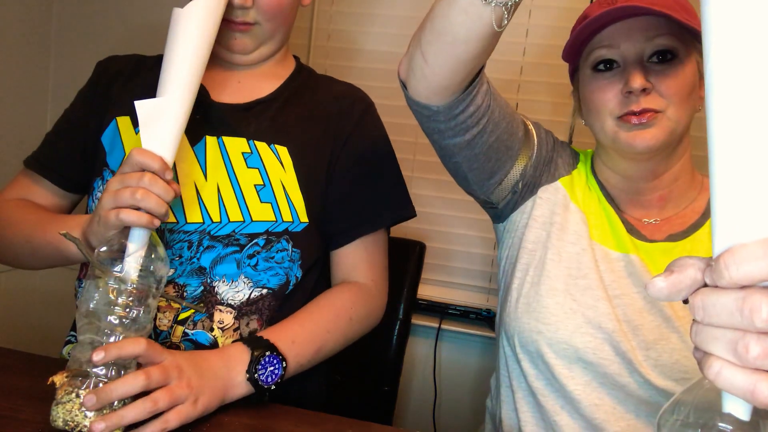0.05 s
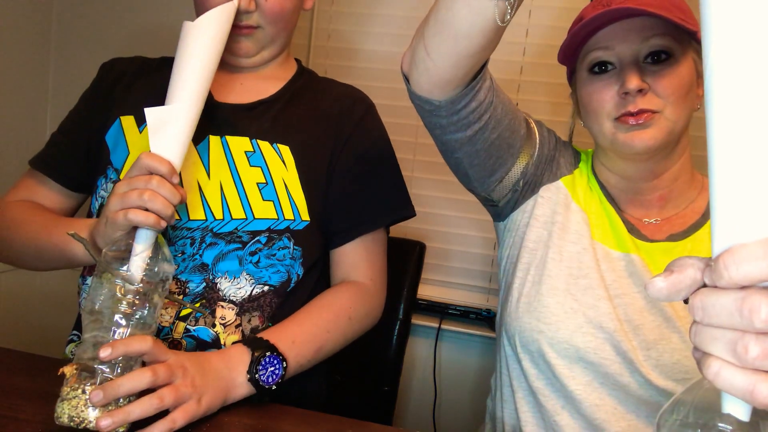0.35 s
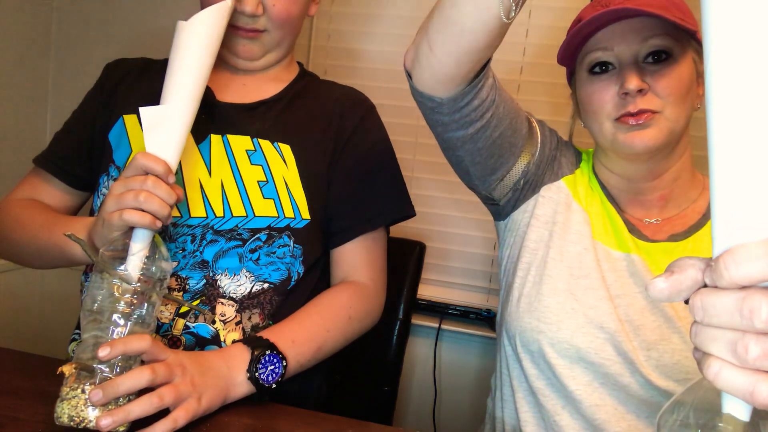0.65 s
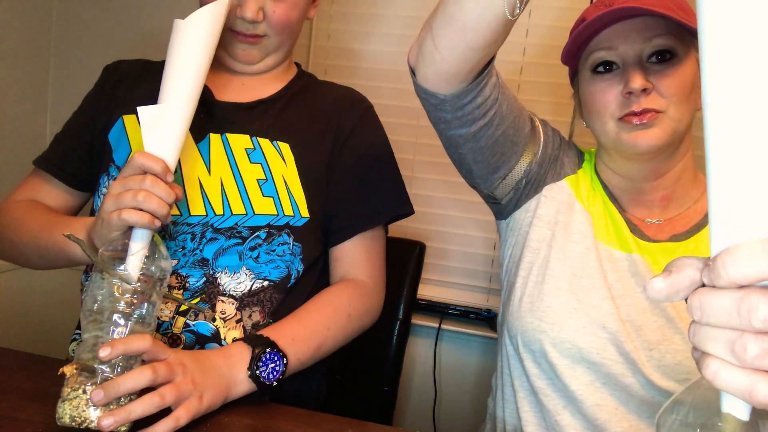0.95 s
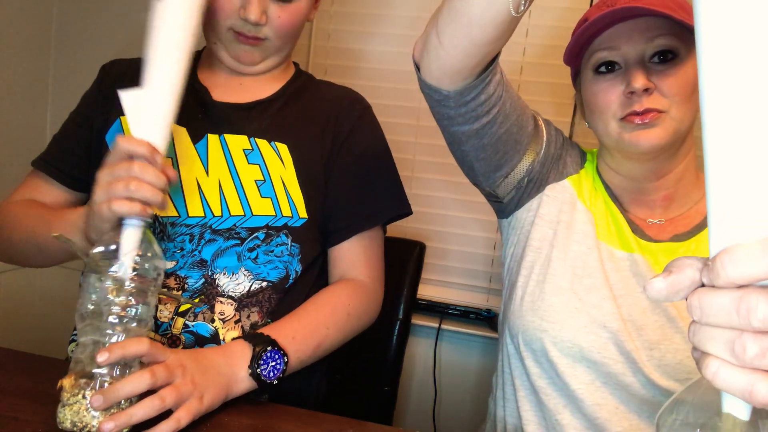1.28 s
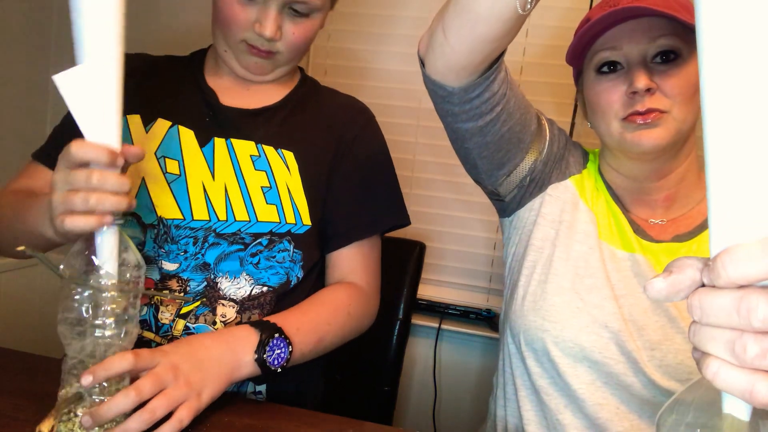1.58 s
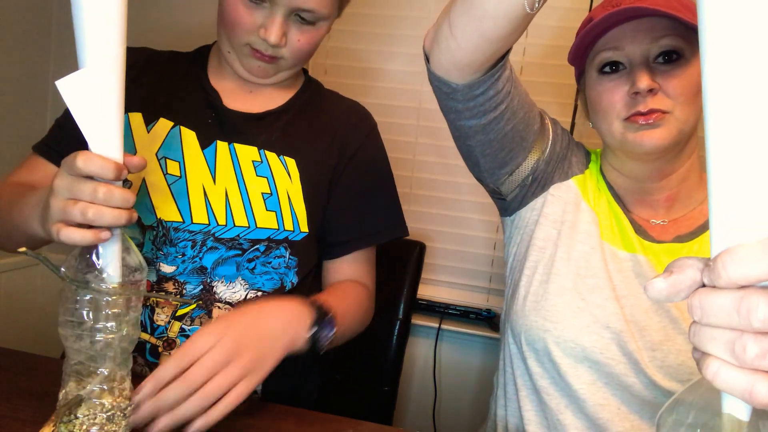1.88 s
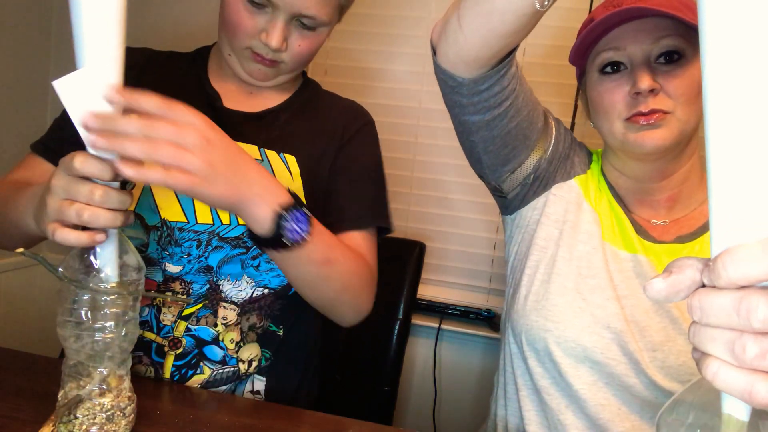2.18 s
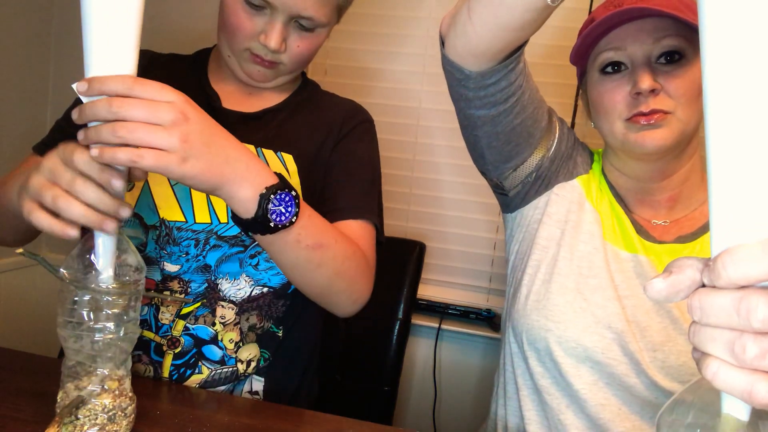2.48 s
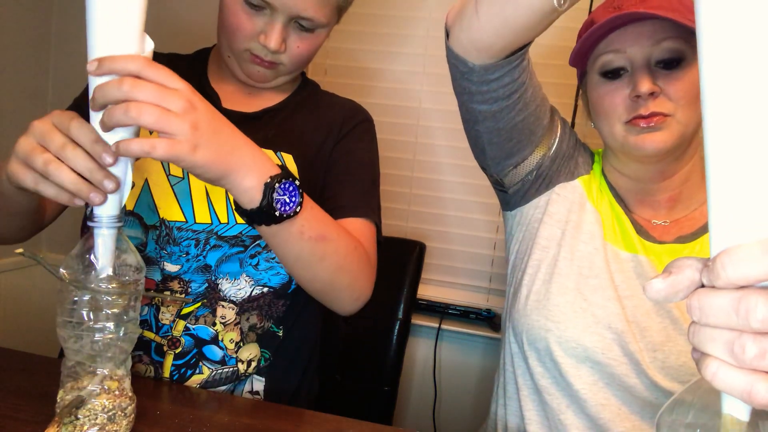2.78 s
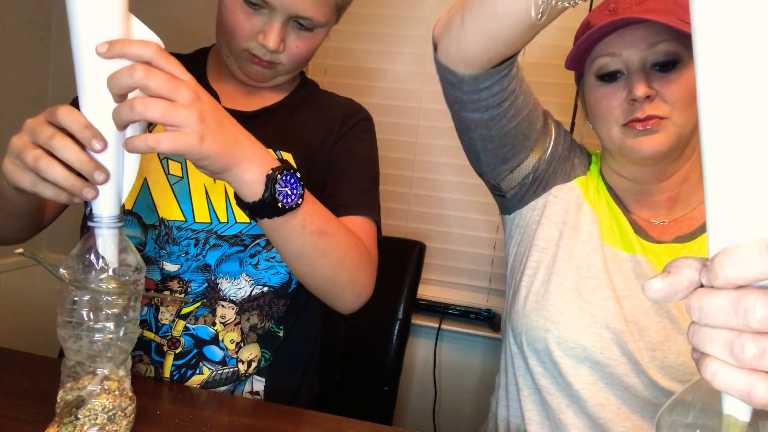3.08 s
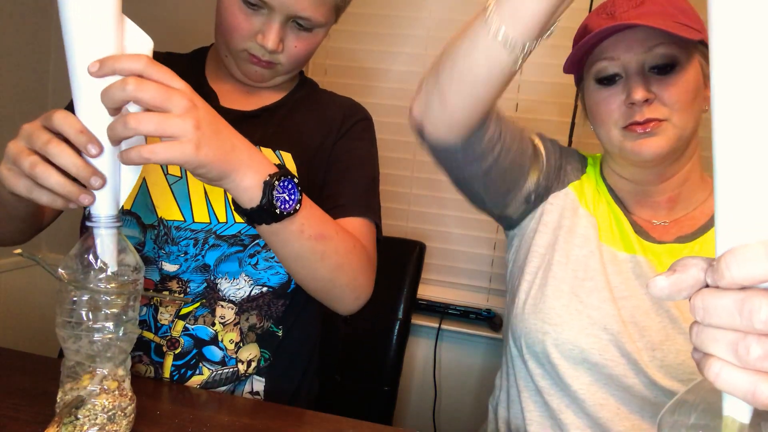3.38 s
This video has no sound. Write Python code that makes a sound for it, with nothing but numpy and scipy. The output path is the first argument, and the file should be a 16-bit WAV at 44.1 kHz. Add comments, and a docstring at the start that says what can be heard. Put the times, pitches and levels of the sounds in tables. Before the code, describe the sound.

Seed rattles down a paper funnel into a plastic bottle, followed by light paper crinkles.

```python
"""Bird seed funnelled into a bottle.

In a small room, loose seeds tick down a rolled paper funnel; a dense stream rattles in a plastic
bottle, then thins to a duller trickle on the paper. Fingers shift the funnel: it bumps the neck,
crinkles and rubs softly. Each contact is a short click filtered by the body it excites."""
import sys
import numpy as np
from scipy import signal
from scipy.fft import rfft, irfft
from scipy.io import wavfile
from scipy.ndimage import uniform_filter1d, map_coordinates

SR = 44100
rng = np.random.default_rng(int(sys.argv[2]) if len(sys.argv) > 2 else 0)


def output_pcm(signal):
    """Save a mono or channel-first signal as 16-bit PCM at the path in sys.argv[1].

    Samples are clipped to [-1, 1] before scaling.
    """
    pcm = np.clip(np.atleast_2d(signal).T, -1, 1) * 32767
    wavfile.write(sys.argv[1], SR, np.round(pcm).astype(np.int16))


N = 160965

# Plastic bottle response. Each row: frequency in Hz, level in dB.
BOTTLE_COLOUR = [(100, -64), (250, -26.5), (400, -14.5), (700, -9), (1700, 1.5), (3100, 1.5), (4500, -3),
                 (7500, -1.5), (8600, -7.5), (10400, -10.5), (11500, -10.5), (16000, -14.5)]
# Bottle resonances. Each row: frequency in Hz, width in Hz, lift in dB.
BOTTLE_MODES = [(351, 12, 7), (764, 25, 4.5), (1161, 45, 6), (2500, 52, 1.5), (5440, 100, 4),
                (10300, 490, -9.5)]


def undb(db):
    """Decibels to gain."""
    return 10 ** (np.asarray(db) / 20)


def on_log(points, hz):
    """Interpolate (Hz, value) points over log frequency."""
    f, v = np.array(points).T
    return np.interp(np.log(hz + 1), np.log(f), v)


def unit(x):
    """Scale to unit energy."""
    return x / np.sqrt(np.sum(x ** 2, axis=-1, keepdims=True))


def add(out, start_s, x):
    """Mix x into out."""
    i = max(int(start_s * SR), 0)
    out[i:i + len(x)] += x[:max(len(out) - i, 0)]


def body(colour, modes=(), size=4096):
    """Minimum-phase response: broad colour plus resonances."""
    hz = np.fft.rfftfreq(size, 1 / SR)
    db = on_log(colour, hz) + sum(lift / (1 + (2 * (hz - f) / w) ** 2) for f, w, lift in modes)
    cepstrum = irfft(np.log(undb(db)))
    cepstrum[1:size // 2] *= 2
    cepstrum[size // 2 + 1:] = 0
    return unit(irfft(np.exp(rfft(cepstrum))))


def room(x, wet_db, build_s=0.0005, size=16384):
    """Add a short diffuse tail, new per call; bass lasts longest."""
    # Each row: frequency in Hz, T60 in seconds.
    decay = [(300, 0.54), (1200, 0.37), (4000, 0.3), (12000, 0.36)]
    t, hz = np.arange(size) / SR, np.fft.rfftfreq(size, 1 / SR)
    noise, tail = rfft(rng.standard_normal(size)), 0
    for f, t60_s in decay:
        band = on_log([(g, float(g == f)) for g, _ in decay], hz)
        tail = tail + irfft(noise * band) * np.exp(-np.log(1000) * t / t60_s)
    tail = unit(tail * (1 - np.exp(-t / build_s)))
    return (x + undb(wet_db) * signal.fftconvolve(x, tail)[:N]) / np.hypot(1, undb(wet_db))


def contacts(hz, ring_s, lift_db, treble_db=0, size=512, width_oct=0.55, rise_share=0.61):
    """One click per pitch: a fast-dying mode cluster, lifted near that pitch."""
    f = np.fft.rfftfreq(size, 1 / SR) + 1
    age = (np.arange(size) + 1) / SR / ring_s
    db = lift_db * np.exp(-.5 * (np.log2(f / np.reshape(hz, (-1, 1))) / width_oct) ** 2)
    db = db + treble_db * f ** 2 / (f ** 2 + 4500 ** 2)
    ring = irfft(np.exp(2j * np.pi * rng.random(db.shape)) * undb(db))
    return unit(ring * np.exp(-age) * (1 - np.exp(-age / rise_share)))


def shower(flow, response, per_s, scatter_db, ring_s, surge_db=1, count=9000, spots=4, surge_per_s=41):
    """Random impacts in spurts on a body; stronger flow brings more and harder ones."""
    when, lot, pitch = rng.random((count, 3)).T
    when_s = when * N / SR
    force = undb(scatter_db * np.clip(rng.standard_normal(count), -2, 2))
    flow_s, flow_db = np.array(flow).T
    gain = undb(np.interp(when_s, flow_s, flow_db, left=-120, right=-120))
    rate = np.minimum(per_s * np.sqrt(gain / gain.max()), count * SR / N)
    surge = undb(surge_db * np.interp(when_s * surge_per_s, np.arange(count), rng.uniform(-2, 2, count)))
    force = force * surge / np.sqrt(np.mean(force ** 2)) * gain * np.sqrt(SR / rate)
    clicks = contacts(500 * 2 ** (5 * pitch), ring_s, lift_db=7, size=256)
    tracks = np.zeros((spots, N))
    for k in np.flatnonzero(lot < rate * N / SR / count):
        add(tracks[k % spots], when_s[k], force[k] * clicks[k])
    return signal.oaconvolve(sum(room(x, wet_db=-6) for x in tracks), response)[:N]


def strikes(rows, response, ring_s):
    """Single timed clicks on a body."""
    out = np.zeros(N)
    for start_s, db, hz, treble_db in rows:
        contact = contacts(hz, ring_s, lift_db=11, treble_db=treble_db)[0]
        click = unit(signal.fftconvolve(contact, response))
        add(out, start_s, undb(db) * np.sqrt(ring_s * SR) / 3 * click)
    return out


def skitter():
    """The first loose seeds bounce down the paper."""
    # Each row: time in seconds, level in dB.
    flow = [(0, -37.5), (0.035, -50.5), (0.1, -45), (0.17, -46), (0.23, -41), (0.27, -50), (0.3, -44.5),
            (0.45, -36.5), (0.55, -48)]
    # Each row: frequency in Hz, level in dB.
    colour = [(100, -46), (450, -4), (1000, 5.5), (1800, 1.5), (3000, 1), (4800, -2.5), (6500, 0),
              (10000, -27), (16000, -23)]
    # Each row: frequency in Hz, width in Hz, lift in dB.
    modes = [(1030, 190, 4.5), (1210, 37, -1), (1800, 290, 5.5), (3850, 510, 8), (5540, 350, 3)]
    return shower(flow, body(colour, modes), per_s=550, scatter_db=2, ring_s=0.0015)


def seed_ticks():
    """Single seeds strike the bottle hard."""
    # Each row: start in seconds, relative level in dB, pitch in Hz, treble in dB.
    hits = [(0.009, -25, 1080, 12), (0.016, -28, 1750, 12), (0.054, -23, 3840, 11), (0.063, -20, 3960, 11),
            (0.086, -19.5, 1780, -5), (0.098, -24, 2230, 15), (0.115, -25.5, 1090, 1.5),
            (0.133, -23.5, 3820, 30), (0.199, -26, 1030, 29), (0.206, -21, 1450, -1),
            (0.217, -20.5, 3930, -15), (0.234, -25, 1800, -1), (0.287, -16, 1900, 5),
            (0.296, -16, 3670, 11), (0.329, -12, 2340, -6), (0.355, -15.5, 1800, 11),
            (0.373, -16.5, 1990, -16), (0.388, -18, 5260, -5), (0.391, -20.5, 1160, 1),
            (0.409, -26, 6000, 7), (0.426, -21, 3000, 2), (0.437, -11.5, 2420, 17), (0.468, -7, 3720, 15),
            (0.512, -10, 1710, 7), (0.522, -10.5, 6030, 1), (0.543, -13, 3340, -26),
            (0.566, -8.5, 2650, -23), (0.587, -16, 1180, -8), (0.619, -5.5, 3270, -9),
            (0.652, -9.5, 1150, -3), (0.69, -10, 1780, -6), (0.787, -11, 3470, 8), (0.834, -13, 2570, 0),
            (0.964, -8, 2580, 2), (0.985, -9.5, 2300, 1), (1.008, -20, 3630, 2), (1.045, -11, 5410, 1),
            (1.082, -11, 7000, 13), (1.259, -10, 3170, 7), (1.335, -13.5, 2590, 0), (1.4, -10, 3060, 4),
            (1.476, -8.5, 3030, 8), (1.584, -7, 3600, 25)]
    return room(strikes(hits, body(BOTTLE_COLOUR, BOTTLE_MODES), ring_s=0.0016), wet_db=-9)


def wall_pings(t60_s=0.24):
    """One bottle wall mode rings on after a seed."""
    # Each row: start in seconds, level in dB, pitch in Hz.
    pings = [(0.149, -40, 1213), (0.385, -43, 1140)]
    out, t = np.zeros(N), np.arange(SR // 2) / SR
    for start_s, db, hz in pings:
        add(out, start_s, undb(db) * np.sin(2 * np.pi * hz * t) * np.exp(-np.log(1000) * t / t60_s))
    return out


def stream():
    """Dense seed rattles in the bottle, with sparse, bright husk ticks."""
    # Each row: time in seconds, level in dB.
    seed_flow = [(0.3, -68), (0.42, -40), (0.5, -31.5), (0.6, -25), (0.72, -26.5), (1.0, -27.5),
                 (1.35, -27), (1.6, -27), (1.77, -29), (1.83, -34.5), (2.2, -36.5), (2.42, -48),
                 (2.66, -41), (2.78, -53)]
    husk_flow = [(0.36, -46), (0.55, -38), (1.0, -41.5), (1.7, -36.5), (2.1, -50), (2.65, -50.5),
                 (2.75, -63)]
    # Each row: frequency in Hz, level in dB.
    husk_colour = [(100, -48), (700, -21), (2000, 1.5), (7000, -4.5), (10400, -2), (12500, -4.5),
                   (16000, -4.5)]
    bottle = body(BOTTLE_COLOUR, BOTTLE_MODES)
    seeds = shower(seed_flow, bottle, per_s=1500, scatter_db=1, ring_s=0.00063, surge_db=0.5)
    husks = shower(husk_flow, body(husk_colour), per_s=76, scatter_db=5.5, ring_s=0.0004,
                   count=1000, spots=1)
    return seeds + husks


def flex(x, share=0.018, per_s=12):
    """The funnel flexes in the hand; a time warp makes its resonances wander."""
    steps = np.arange(N) / SR * per_s
    bend = rng.standard_normal(int(steps[-1]) + 2)
    shift = np.cumsum(np.interp(steps, np.arange(len(bend)), bend)) * share
    shift = shift - uniform_filter1d(shift, SR // 2)
    return map_coordinates(x, [np.arange(N) + shift], order=5, mode="mirror")


def trickle():
    """Seed patters in the flexing paper funnel."""
    # Each row: time in seconds, level in dB.
    flow = [(0.45, -38.5), (1.1, -37.5), (1.55, -35.5), (1.75, -31.5), (1.95, -31.5), (2.16, -31),
            (2.39, -32.5), (2.55, -34.5), (2.69, -36), (2.77, -46.5), (2.93, -47.5)]
    # Each row: frequency in Hz, level in dB.
    colour = [(100, -35), (260, -9.5), (450, -4), (900, 0), (2000, 3), (4200, 3), (4950, -2.5), (5800, 0.5),
              (8500, -7.5), (10400, -10), (11500, -8), (16000, -11)]
    # Each row: frequency in Hz, width in Hz, lift in dB.
    modes = [(393, 9.8, 6.5), (651, 58, 7.8), (742, 76, 7.3), (1080, 110, 4.6), (1614, 91, 6.1),
             (1860, 160, 3), (3620, 290, 3.2)]
    return flex(shower(flow, body(colour, modes), per_s=1100, scatter_db=3, ring_s=0.0015, surge_db=1.24))


def neck_bumps():
    """The funnel knocks on the bottle neck."""
    # Each row: start in seconds, relative level in dB, pitch in Hz.
    bumps = [(1.24, -14.5, 620), (1.989, -12.5, 615), (1.994, -11, 1550), (2.083, -16.5, 483),
             (2.12, -10.5, 1720), (2.134, -11, 1400), (2.146, -13, 1500), (3.094, -19.5, 1020),
             (3.167, -20.5, 500), (3.212, -12, 1490), (3.222, -15.5, 504), (3.243, -8.5, 1280),
             (3.249, -12.5, 790), (3.255, -7, 1140)]
    # Each row: frequency in Hz, level in dB.
    colour = [(40, -33), (150, -19.5), (260, -15.5), (420, -1), (1000, -14), (1650, -1.5), (2300, -5.5),
              (5000, -29), (16000, -40)]
    # Each row: frequency in Hz, width in Hz, lift in dB.
    modes = [(397, 23, 6.6), (557, 50, 4.5), (750, 65, 9), (950, 82, 15), (1058, 41, 14), (1550, 110, 4.6)]
    knocks = strikes([(s, db, hz, 0) for s, db, hz in bumps], body(colour, modes), ring_s=0.0029)
    return room(undb(-4) * knocks, wet_db=-9)


def crinkle():
    """Paper snaps at its creases and crumples under the fingers."""
    # Each row: start in seconds, relative level in dB, pitch in Hz, treble in dB.
    creases = [(1.718, -8.5, 3660, -6), (1.752, -9, 3870, 13), (1.766, -10, 3720, 2), (1.775, -10, 3600, 0),
               (1.85, -15, 1630, -3), (1.952, -12, 3440, 14), (2.015, -13.5, 6300, 5),
               (2.076, -16.5, 5500, 4), (2.54, -13.5, 1590, -7), (2.566, -19.5, 2160, -11),
               (2.667, -12.5, 3750, -10), (2.734, -17.5, 3170, -5), (2.789, -19.5, 1630, 14),
               (2.844, -23.5, 2210, 12), (2.854, -22.5, 1510, -15.5), (2.877, -23, 8100, 7),
               (2.917, -25, 1550, -7), (2.925, -27, 1650, 6), (2.964, -26, 3000, 12),
               (2.968, -15.5, 2850, 0), (2.977, -14.5, 5560, 20), (2.98, -12, 2140, 3),
               (2.986, -13, 6810, -1), (3.016, -14.5, 3350, 0), (3.02, -12.5, 2300, 3),
               (3.03, -20, 1750, 0), (3.037, -18, 1750, 9), (3.046, -14, 3550, 13), (3.093, -12.5, 2080, 2),
               (3.106, -19, 1840, 11), (3.113, -20, 1800, 7), (3.124, -17, 6000, 1), (3.127, -18, 2350, 1),
               (3.143, -11.5, 3850, -6), (3.166, -11.5, 2030, -4), (3.218, -15, 1900, 2),
               (3.23, -12.5, 2970, 0), (3.268, -19.5, 7300, 8), (3.294, -17, 3900, 10),
               (3.322, -19, 1700, -3), (3.325, -16.5, 5950, -12), (3.335, -19, 1570, -1),
               (3.347, -20, 3920, 8), (3.396, -21, 6150, 8), (3.469, -23, 2560, 5)]
    # Each row: time in seconds, level in dB.
    crumpling = [(2.955, -42), (2.98, -39.5), (3.04, -40.5), (3.08, -44), (3.11, -39.5), (3.18, -37.5),
                 (3.23, -38.5), (3.29, -51), (3.335, -39.5), (3.42, -45.5)]
    # Each row: frequency in Hz, level in dB.
    colour = [(100, -37), (250, -8), (400, -1.5), (1000, -1.5), (2200, -0.5), (4200, -1), (4950, -6.5),
              (6200, -1.5), (8500, -12), (11000, -13.5), (16000, -20)]
    # Each row: frequency in Hz, width in Hz, lift in dB.
    modes = [(386, 55, 6), (780, 76, 2.2), (1030, 47, 3.7), (1610, 200, 6.6), (2230, 270, 3.5),
             (3580, 650, 1.8)]
    paper = body(colour, modes)
    snaps = undb(0.5) * strikes(creases, paper, ring_s=0.0016)
    crumple = shower(crumpling, paper, per_s=700, scatter_db=1, ring_s=0.0012, spots=2)
    return room(snaps, wet_db=-6.5) + crumple


def slide():
    """Seed slides along the paper as the funnel tips upright."""
    # Each row: time in seconds, level in dB.
    flow = [(1.735, -43.5), (1.755, -35), (1.778, -30), (1.795, -46)]
    # Each row: frequency in Hz, level in dB.
    colour = [(100, -50), (2400, -16), (3500, 0), (4100, 0), (5200, -14), (16000, -26)]
    return shower(flow, body(colour), per_s=1300, scatter_db=3, ring_s=0.0016, surge_db=-1, spots=1)


def rub():
    """Paper rubs on hand and bottle neck."""
    # Each row: time in seconds, level in dB.
    friction = [(2.6, -62.5), (2.85, -45.5), (2.93, -49), (3.35, -45), (3.48, -52.5), (3.53, -44.5),
                (3.65, -51)]
    # Each row: frequency in Hz, level in dB.
    colour = [(100, -35), (450, -5.5), (800, 2.5), (1900, 3.5), (6800, 5), (8500, -3.5), (10400, -5.5),
              (13000, -1.5), (16000, -6)]
    return shower(friction, body(colour), per_s=1200, scatter_db=6, ring_s=0.0036, spots=2)


def room_tone():
    """Faint, steady coloured noise."""
    # Each row: frequency in Hz, level in dB.
    colour = [(20, -24), (55, -11), (90, -10.5), (250, -9), (500, -13), (2000, -6.5), (16000, -20)]
    return undb(-51) * signal.fftconvolve(rng.standard_normal(N), body(colour))[:N]


def scene():
    """Room tone, seed and paper, in mono."""
    air = room_tone()
    seed = skitter() + stream() + trickle() + slide() + seed_ticks() + wall_pings()
    paper = neck_bumps() + crinkle() + rub()
    return (air + seed + paper)[None]


def record(dry, ceiling=0.37, top_hz=15900):
    """Soft-clip the peaks, then low-pass."""
    lowpass = signal.ellip(10, .2, 70, top_hz, fs=SR, output="sos")
    return signal.sosfilt(lowpass, ceiling * np.tanh(dry / ceiling))


dry = scene()
out = record(dry)
output_pcm(out)
```